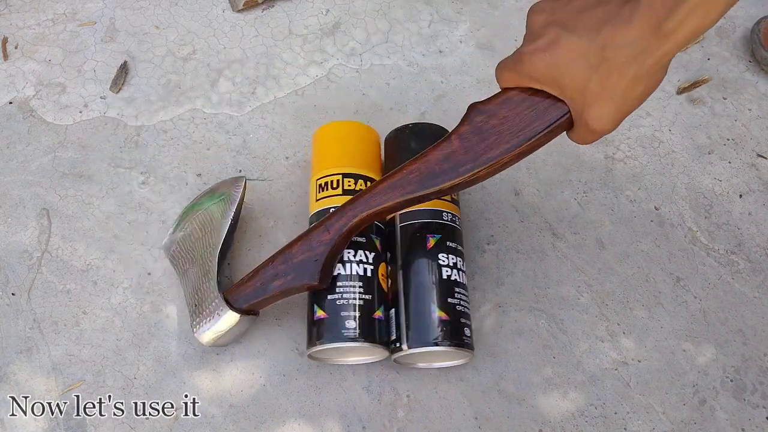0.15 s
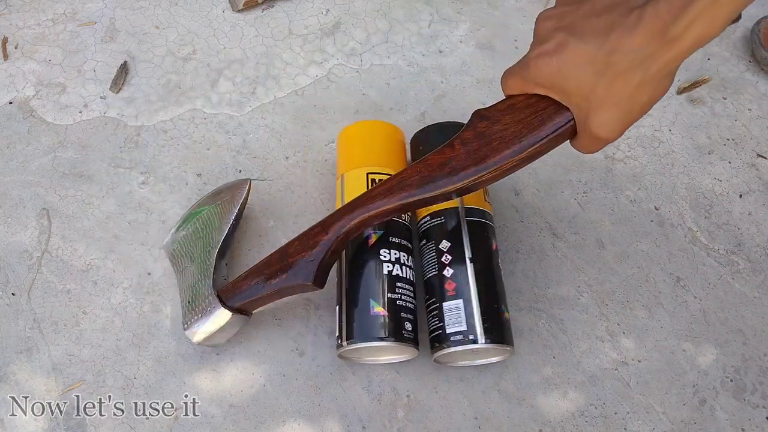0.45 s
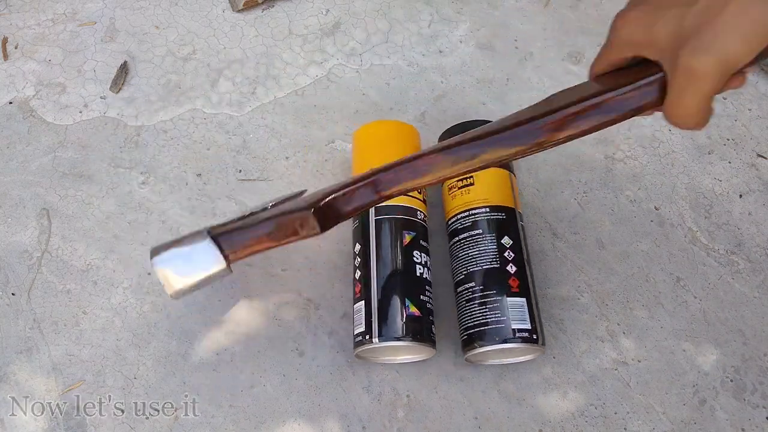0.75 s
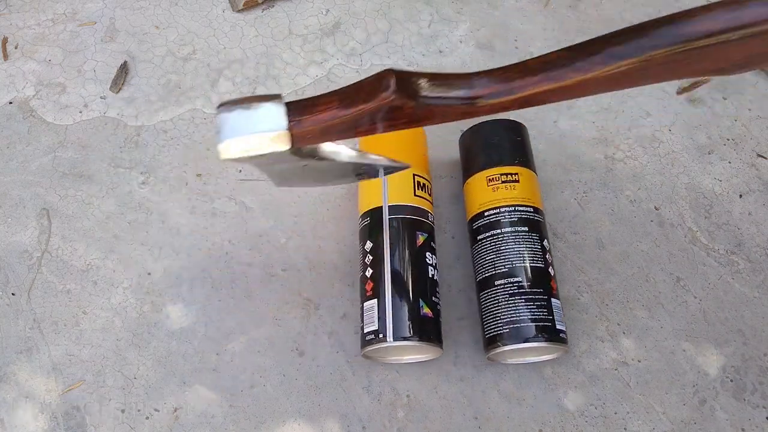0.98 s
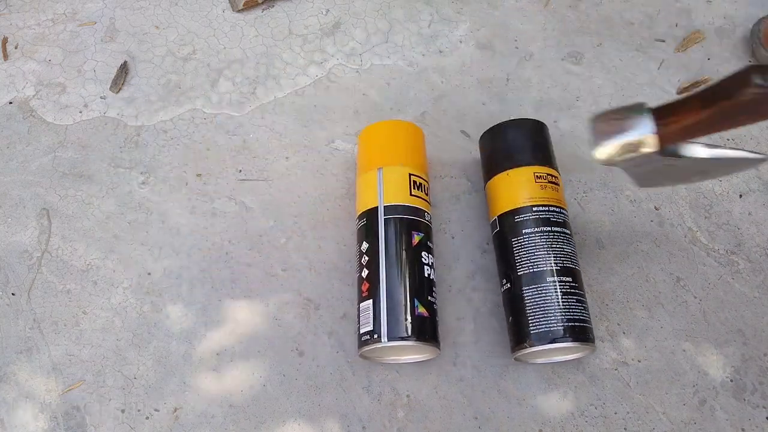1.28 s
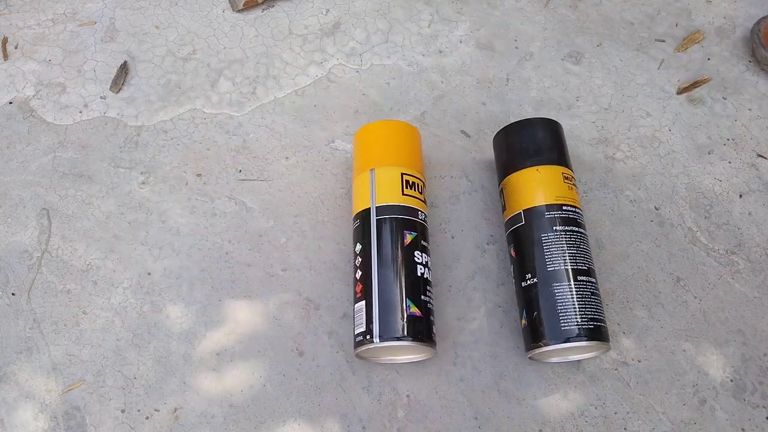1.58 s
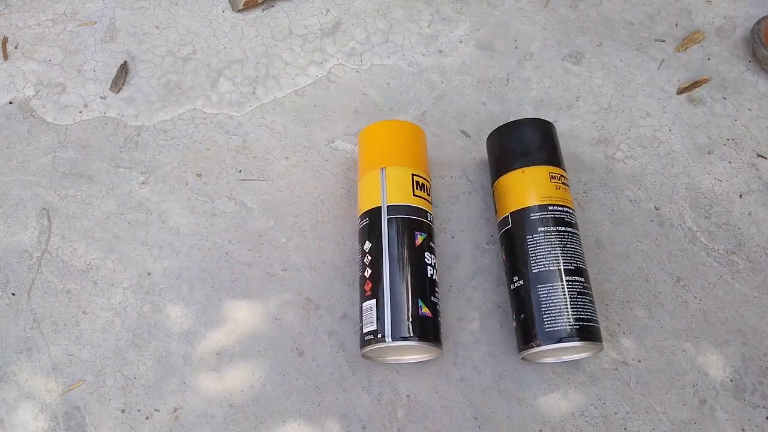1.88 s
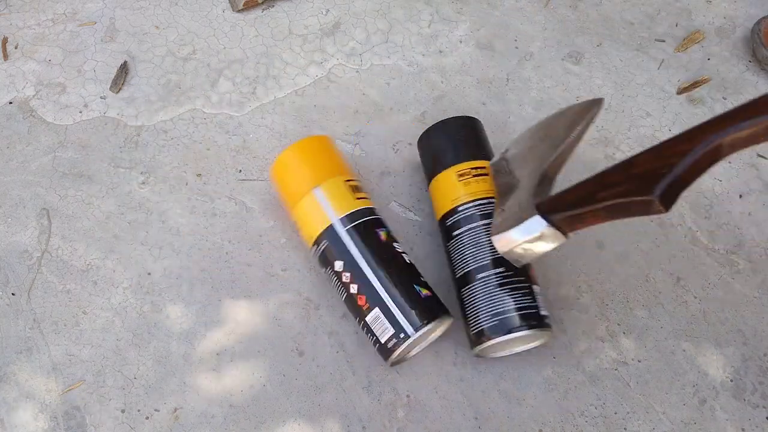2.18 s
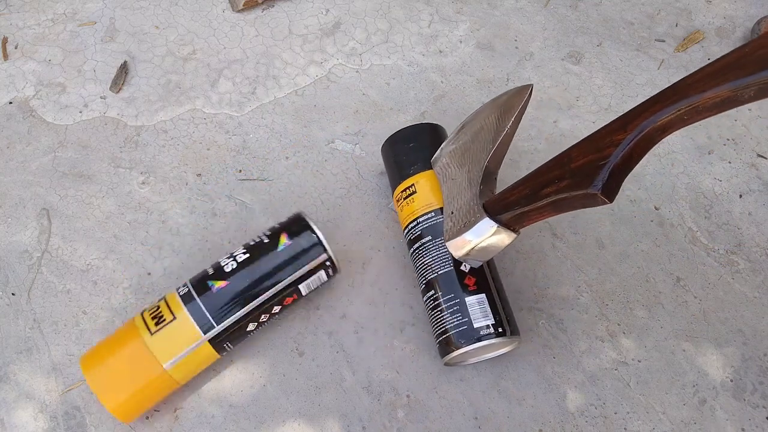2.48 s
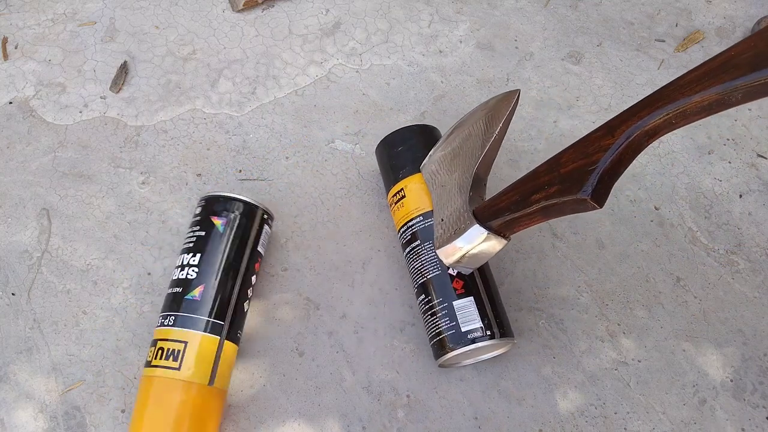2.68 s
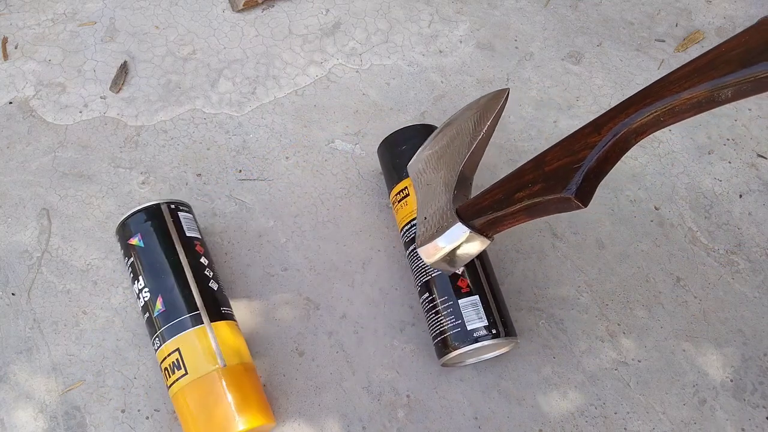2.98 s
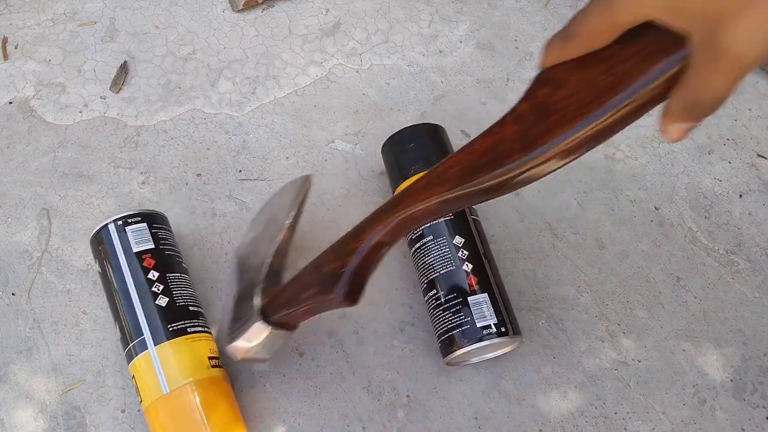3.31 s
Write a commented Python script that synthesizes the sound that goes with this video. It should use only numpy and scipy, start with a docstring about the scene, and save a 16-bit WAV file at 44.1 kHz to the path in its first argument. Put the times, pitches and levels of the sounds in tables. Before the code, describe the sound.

Metal spray cans clatter on concrete at about 0.2 seconds, shoved by an axe. Soft scrapes, light wooden handle knocks and faint paint gurgles follow, fading to a lull. At 2.3 seconds a second blow sends one can skidding and rattling on its rim, then rolling until 3 seconds. The axe head clicks brightly on the other can around 3 and 3.2 seconds. Everything is close, with a short echo.

```python
"""Two steel spray cans on a concrete floor, one microphone close by, walls near enough for a short echo.
Paint gurgles faintly over quiet air. An axe shoves the cans apart: their thin shells clatter, the wooden
handle bumps them, and they rock and roll on the grit. The axe head slips off and hums; a soft rub fills
the pause. A second blow sends one can skidding, spinning on its rim and rolling away, and last the axe
head clicks on the other."""
import sys
import numpy as np
from scipy import signal
from scipy.fft import rfft, irfft
from scipy.io import wavfile

SR = 44100
rng = np.random.default_rng(int(sys.argv[2]) if len(sys.argv) > 2 else 0)


def transcribe(signal):
    """Save signal, clipped to [-1, 1], as a 16-bit WAV file at the path in sys.argv[1]."""
    frames = np.atleast_2d(signal).T
    limited = np.clip(frames, -1, 1)
    pcm = np.round(limited * 32767).astype(np.int16)
    wavfile.write(sys.argv[1], SR, pcm)


N = 152145

# Levels in all tables are relative. Spectra (frequency [Hz], level [dB]):
AIR_SPECTRUM = [(30, -33), (90, -6), (200, 4.5), (300, -4), (450, -6.5), (1200, -2), (3500, -14.5),
                (15000, -46.5)]  # the quiet of the place
SHELL_SPECTRUM = [(60, -69), (350, -13.5), (580, -20.5), (1250, 4), (1650, -3), (2150, -1.5), (3100, -20.5),
                  (3700, -19.5), (7000, -25)]  # dense, short resonances of a can
GRIT_SPECTRUM = [(800, -21.5), (2500, -12), (3700, 1), (4250, -5), (5000, -2.5), (6000, -5), (7400, -2.5),
                 (8700, -10.5), (11500, -17.5), (15500, -15.5)]  # crushed grit
THUD_SPECTRUM = [(30, -48), (130, -3), (360, 6.5), (1000, 6), (2500, -48.5), (15000, -70)]  # a thud on the floor
CLICK_SPECTRUM = [(200, -29), (520, -29), (740, 8.5), (1050, -11.5), (2000, 6.5), (3200, -2), (5000, 13.5),
                  (5800, 4), (7400, 7.5), (8600, -8.5), (15500, -15)]  # steel snapping on steel
WALL_SPECTRUM = [(60, 7.5), (200, 11), (500, 4.5), (4000, 2.5), (15000, -11)]  # the echo

# Modes (frequency [Hz], T60 [s], level [dB]):
PAIR_MODES = [(1015, 0.089, -4), (1105, 0.087, 4), (1309, 0.057, -4.5), (1310, 0.3, 8), (1387, 0.15, -2),
              (1482, 0.15, -0.5), (1873, 0.15, 1), (2127, 0.073, -2), (2316, .06, -7.5), (2640, 0.077, -7),
              (3693, 0.034, -11.5)]  # both cans rattling together
HANDLE_MODES = [(457, 0.061, -6), (670, 0.11, -10.5), (793, 0.04, 8), (1034, .04, 3)]  # the wooden handle
SIDE_MODES = [(1083, 0.043, -3.5), (1361, 0.12, 2), (1870, 0.11, -1.5), (2147, 0.022, 1.5),
              (2513, 0.018, -4), (3745, 0.061, -4.5)]  # a can on its side
HEAD_MODES = [(1460, 4.2, -1.5), (2220, 10.5, -4.5)]  # the lifted axe head
RIM_MODES = [(1185, 0.27, -2.5), (1335, 0.51, -7.5), (1470, 0.4, -12), (1906, 0.066, -12.5),
             (2090, 0.2, 2.5), (2147, 0.1, 1), (2488, 0.16, -13), (3503, 0.23, -15)]  # a can on its rim
CLICK_MODES = [(779.4, 1, -5), (2133, 0.3, 1), (3870, 0.067, 6), (4620, 0.046, 7), (5150, 0.087, 0),
               (6840, 0.06, 7)]  # the axe head against the pinned can

# Gliding resonances (start [s], length [s], first pitch [Hz], last pitch [Hz], level [dB]):
GURGLES = [(0, 0.083, 464, 517, -61), (.54, 0.081, 410, 372, -67), (1.03, 0.29, 390, 310.3, -69.5),
           (1.36, 0.079, 500, 411, -61), (1.63, 0.224, 807, 759, -68), (1.93, 0.175, 308, 352, -71.5),
           (3.34, 0.094, 325, 329, -61.5)]  # paint in a can
SHELL_GLIDES = [(.73, 0.069, 1383, 1283, -45), (1.325, 0.089, 3650, 3713, -49.5),
                (2.45, 0.14, 3610, 3960, -33), (2.565, 0.098, 2770, 3076, -32.5),
                (2.74, .21, 2680, 2994, -35.5), (2.77, 0.24, 3864, 3970, -39)]  # a shell singing as it turns

# Contact force between can and floor (time [s], level [dB]):
SHOVE_FORCE = [(.234, -28), (.275, -22), (.30, -26), (.35, -30), (.405, -34), (.44, -38.5)]
SKID_FORCE = [(2.262, -31), (2.29, -31), (2.36, -36), (2.388, -31.5), (2.425, -40), (2.49, -37)]
SPIN_FORCE = [(2.38, -33.5), (2.47, -29), (2.505, -38), (2.605, -29), (2.72, -32.5), (2.77, -57)]
ROLL_FORCE = [(2.73, -32), (2.8, -29.5), (2.89, -29.5), (2.96, -40.5)]

# Axe blows and cans knocking together (time [s], ring [dB], crack [dB], thud [dB])
BLOWS = [(.2353, -34, -43, -36.5), (.2478, -22, -34, -28.5), (.268, -43, -42, -32), (.278, -19, -44, -28.5),
         (.309, -18.5, -52, -56), (.33, -20, -44, -43), (.774, -49, -50.5, -70), (.8105, -44, -69, -78),
         (.9358, -45.5, -71, -53), (1.623, -56, -65, -94), (1.722, -59, -56, -89.5),
         (2.2613, -30.5, -27, -36.5), (2.2655, -34, -36, -23), (2.2982, -57.5, -25, -26.5),
         (2.3135, -29, -37, -28.5), (2.3205, -55, -44, -53), (2.332, -29, -42, -23.5),
         (2.363, -37, -58, -30), (2.382, -25, -54, -37)]
# The handle bumps a can (time [s], level [dB])
HANDLE_KNOCKS = [(.2478, -28), (.774, -58), (.9358, -41.5), (1.297, -49)]
# A can rocks or is dragged a short way (start [s], length [s], ring [dB], grit [dB])
SCRAPES = [(0.45, 0.072, -46, -52), (0.682, 0.11, -57, -67), (0.789, 0.038, -55.5, -59),
           (0.933, 0.038, -45, -50), (1.02, 0.26, -60.5, -74), (1.097, 0.044, -55.5, -57.5),
           (1.287, .12, -50.5, -53.5), (1.455, 0.628, -68, -86), (2.971, 0.054, -47, -48),
           (3.088, 0.17, -52.5, -58.5), (3.319, 0.056, -54.5, -55.5)]
# The axe head slips off a can (time [s], level [dB])
HEAD_SLIPS = [(1.4, -65)]
# The rim hits the floor (time [s], ring [dB], crack [dB])
RIM_KNOCKS = [(2.4205, -39, -27), (2.471, -26.5, -33.5), (2.516, -45, -34.5), (2.541, -24.5, -30.5),
              (2.581, -24.5, -34), (2.5995, -22, -29), (2.6505, -24, -37), (2.697, -24, -45),
              (2.75, -31.5, -38), (2.786, -33.5, -41.5)]
# The axe head clicks on the pinned can (time [s], ring [dB], crack [dB])
AXE_CLICKS = [(2.9717, -41.5, -27.5), (2.9915, -50, -40), (3.009, -67, -50), (3.1785, -31.5, -22.5),
              (3.2118, -52, -36), (3.3208, -70, -42.5)]

GRAINS_PER_S, TICKS_PER_S = 2600, 600  # fine grit that drives the shell; sharp ticks that rasp
TIME = np.arange(N) / SR


def amp(db):
    """Decibels to gain."""
    return 10 ** (np.asarray(db) / 20)


def decay(age, t60_s):
    """A fade of 60 dB in every t60_s."""
    return np.exp(-np.log(1000) * age / t60_s)


def excite(x, response):
    """Drive an impulse response, scaled to unit energy."""
    return signal.fftconvolve(x, response / np.linalg.norm(response))[:N]


def colour(x, spectrum, size=4096):
    """Minimum-phase filter with the given spectrum; white noise keeps its level."""
    hz, db = np.array(spectrum).T
    bin_hz = np.arange(size // 2 + 1) * SR / size
    gain = amp(np.interp(np.log(bin_hz + 1), np.log(hz), db))
    cepstrum = irfft(np.log(gain))
    cepstrum[1:size // 2] *= 2
    cepstrum[size // 2 + 1:] = 0
    return excite(x, irfft(np.exp(rfft(cepstrum))))


def ring(force, modes):
    """A force rings a body's modes: damped sines of alternating sign."""
    t = TIME[:SR // 2]
    response = sum((-1) ** k * amp(db) / np.sqrt(t60) * decay(t, t60) * np.sin(2 * np.pi * hz * t)
                   for k, (hz, t60, db) in enumerate(modes))
    return excite(force, response)


def shimmer(force, t60_s):
    """Countless close resonances of thin steel, dying together."""
    t = TIME[:SR // 4]
    return excite(force, rng.standard_normal(len(t)) * decay(t, t60_s))


def taps(rows, column):
    """One impulse per row, as strong as the given column says."""
    impulses = np.zeros(N)
    for row in rows:
        impulses[int(row[0] * SR)] += amp(row[column])
    return impulses


def burst(impulses, decay_s):
    """Each impulse sets off a fast-dying puff of noise."""
    envelope = signal.lfilter([1], [1, -np.exp(-1 / (decay_s * SR))], impulses)
    return envelope * rng.standard_normal(N)


def grains(per_s, spread_db=0):
    """Dense tiny impacts of metal on grit, rms 1."""
    impacts = (rng.random(N) < per_s / SR) * rng.choice([-1, 1], N)
    impacts = impacts * amp(spread_db * np.minimum(rng.exponential(size=N), 4))
    return impacts / np.std(impacts)


def rubbed_mode(force, hz, t60_s):
    """One noise-driven resonance whose pitch may move."""
    pole = decay(1 / SR, t60_s)
    friction = force * (rng.standard_normal(N) + 1j * rng.standard_normal(N))
    swell = signal.lfilter([np.sqrt(1 - pole ** 2)], [1, -pole], friction)
    phase = 2 * np.pi * np.cumsum(hz * np.ones(N)) / SR
    return np.real(swell * np.exp(1j * phase))


def glides(rows, rough_db, t60_s, tone_db=-5):
    """Resonances that swell, slide in pitch and fade: clear tones with a rough edge."""
    sound = np.zeros(N)
    for start, length, from_hz, to_hz, db in rows:
        progress = np.clip((TIME - start) / length, 0, 1)
        force = amp(db) * np.sin(np.pi * progress)
        hz = from_hz + (to_hz - from_hz) * np.sin(np.pi / 2 * progress)
        sound += amp(tone_db) * force * np.sin(2 * np.pi * np.cumsum(hz) / SR)
        sound += amp(rough_db) * rubbed_mode(force, hz, t60_s)
    return sound


def air():
    """Faint, steady air around the microphone."""
    return amp(-77.5) * colour(rng.standard_normal(N), AIR_SPECTRUM)


def paint_gurgles():
    """Paint moves inside a can with low, sliding tones."""
    return glides(GURGLES, rough_db=-1, t60_s=0.18)


def rattle(force, modes, ring_db, shell_db):
    """Grit under a moving can rings its modes and rattles the shell."""
    push = grains(GRAINS_PER_S) * force
    shell = colour(shimmer(push, t60_s=0.1), SHELL_SPECTRUM)
    return amp(ring_db) * ring(push, modes) + amp(shell_db) * shell


def rasp(force):
    """Grit rasps brightly on steel: sharp ticks, each with a short shimmer."""
    ticks = grains(TICKS_PER_S, spread_db=4.5) * force
    return colour(amp(-5) * ticks + shimmer(ticks, t60_s=0.045), GRIT_SPECTRUM)


def contact_force(curve):
    """The force of a can on the floor, zero outside the curve."""
    times, db = np.array(curve).T
    touching = (TIME >= times[0]) & (TIME <= times[-1])
    return touching * amp(np.interp(TIME, times, db))


def travel(curve, modes, ring_db, shell_db, grit_db):
    """A can slides, spins or rolls over concrete: one contact force drives rattle and rasp."""
    force = contact_force(curve)
    return rattle(force, modes, ring_db, shell_db) + amp(grit_db) * rasp(force)


def knocks(rows, modes, thud_taps, ring_db, clank_db, clank_s):
    """Each knock rings the can, with a short clank, a crack of grit and a thud."""
    strikes = taps(rows, 1)
    clank = colour(burst(strikes, clank_s), SHELL_SPECTRUM)
    crack = colour(burst(taps(rows, 2), decay_s=0.0075), GRIT_SPECTRUM)
    thud = colour(burst(thud_taps, decay_s=0.0024), THUD_SPECTRUM)
    return amp(ring_db) * ring(strikes, modes) + amp(clank_db) * clank + crack + thud


def axe_blows():
    """The axe strikes the cans and they clatter together."""
    return knocks(BLOWS, PAIR_MODES, taps(BLOWS, 3), ring_db=25.5, clank_db=-5, clank_s=0.005)


def handle_knocks():
    """Wood against a can: a short hollow knock."""
    return amp(22.5) * ring(taps(HANDLE_KNOCKS, 1), HANDLE_MODES)


def scrapes(attack_s=0.019, release_s=0.029):
    """A can on its side rocks and drags over the grit in short swells."""
    shell_force, grit_force = np.zeros(N), np.zeros(N)
    for start, length, ring_db, grit_db in SCRAPES:
        rise = np.clip((TIME - start) / attack_s, 0, 1)
        fall = np.exp(-np.maximum(TIME - start - length, 0) / release_s)
        shell_force += amp(ring_db) * rise * fall
        grit_force += amp(grit_db) * rise * fall
    return rattle(shell_force, SIDE_MODES, ring_db=-5.5, shell_db=-0.5) + rasp(grit_force)


def singing_shell():
    """The travelling contact makes a shell resonance sing and glide."""
    return glides(SHELL_GLIDES, rough_db=-6, t60_s=0.039)


def axe_head_hum():
    """The steel head rings on faintly after slipping off a can."""
    hum = np.zeros(N)
    for start, db in HEAD_SLIPS:
        age = np.maximum(TIME - start, 0)
        for hz, t60, mode_db in HEAD_MODES:
            hum += amp(db + mode_db) * decay(age, t60) * np.sin(2 * np.pi * hz * age)
    return hum


def soft_rub(peak_s=2.013, width_s=0.12, cutoff_hz=4000):
    """A faint, narrow band of rubbing swells and fades in the pause."""
    force = amp(-71) * np.exp(-((TIME - peak_s) / width_s) ** 2 / 2)
    lowpass = signal.butter(4, cutoff_hz, fs=SR, output="sos")
    return signal.sosfilt(lowpass, rubbed_mode(force, hz=3240, t60_s=0.0083))


def skid_rumble():
    """The struck can bumps low over the concrete as it skids."""
    bumps = grains(GRAINS_PER_S) * contact_force(SKID_FORCE)
    return amp(-11.5) * colour(bumps, THUD_SPECTRUM)


def rim_knocks():
    """The spinning can knocks its rim on the floor."""
    thud_taps = amp(-19) * taps(RIM_KNOCKS, 2)  # each thud follows the strength of its crack
    return knocks(RIM_KNOCKS, RIM_MODES, thud_taps, ring_db=29.5, clank_db=-22, clank_s=0.004)


def axe_clicks():
    """The axe head on the pinned can, steel on steel: a bright snap and a brief ring."""
    strikes, cracks = taps(AXE_CLICKS, 1), taps(AXE_CLICKS, 2)
    snap = colour(burst(cracks, decay_s=0.0078) + amp(3) * cracks, CLICK_SPECTRUM)
    return amp(24.5) * ring(strikes, CLICK_MODES) + snap


def wall_echo(direct, t60_s=0.47, delay_s=0.0035):
    """Nearby walls send a short, diffuse echo back to the microphone."""
    t = TIME[:SR]
    tail = rng.standard_normal(SR) * decay(t, t60_s) * (t > delay_s)
    return amp(-14.52) * colour(excite(direct, tail), WALL_SPECTRUM)


def scene():
    """At the microphone, in mono: cans and axe, their echo off the walls, and quiet air."""
    direct = axe_blows() + rim_knocks()
    direct += travel(SHOVE_FORCE, PAIR_MODES, ring_db=1, shell_db=-13, grit_db=-13)
    direct += travel(SKID_FORCE, PAIR_MODES, ring_db=-3, shell_db=-0.5, grit_db=-7)
    direct += travel(SPIN_FORCE, RIM_MODES, ring_db=1.5, shell_db=-18, grit_db=-8)
    direct += travel(ROLL_FORCE, SIDE_MODES, ring_db=-3, shell_db=-15, grit_db=-15.5)
    direct += singing_shell() + paint_gurgles()
    direct += skid_rumble() + scrapes() + soft_rub()
    direct += handle_knocks() + axe_head_hum() + axe_clicks()
    return (direct + wall_echo(direct) + air())[None]


def record(dry):
    """The microphone cuts the deep bass and the very top."""
    low_cut_hz, top_hz = 116, 15750
    highpass = signal.butter(2, low_cut_hz, "high", fs=SR, output="sos")
    lowpass = signal.ellip(10, 0.2, 80, top_hz, fs=SR, output="sos")
    return signal.sosfilt(lowpass, signal.sosfilt(highpass, dry))


dry = scene()
out = record(dry)
transcribe(out)
```